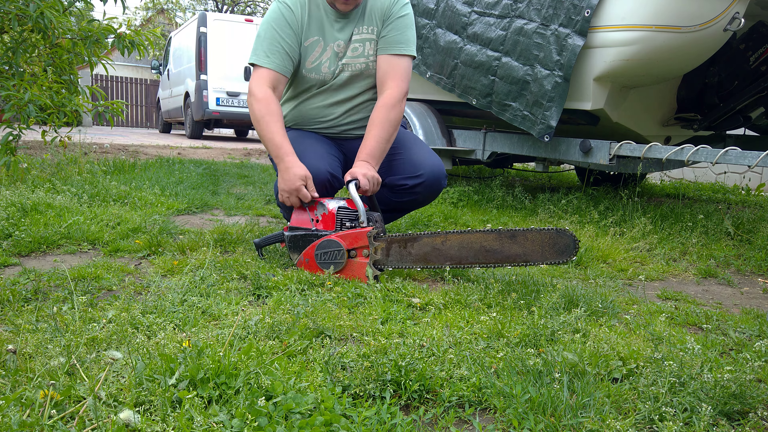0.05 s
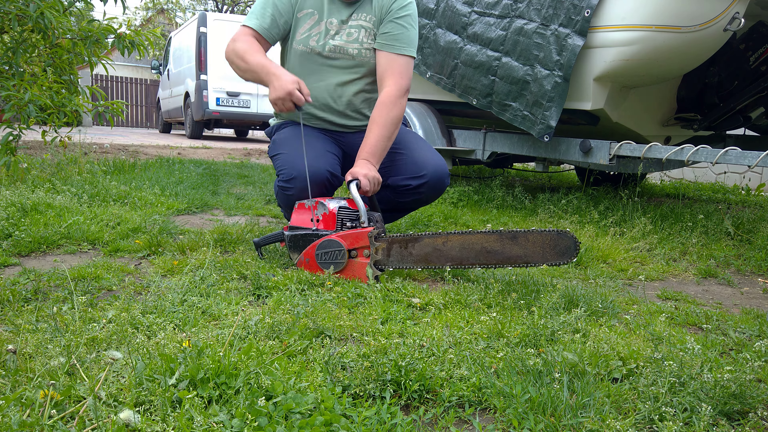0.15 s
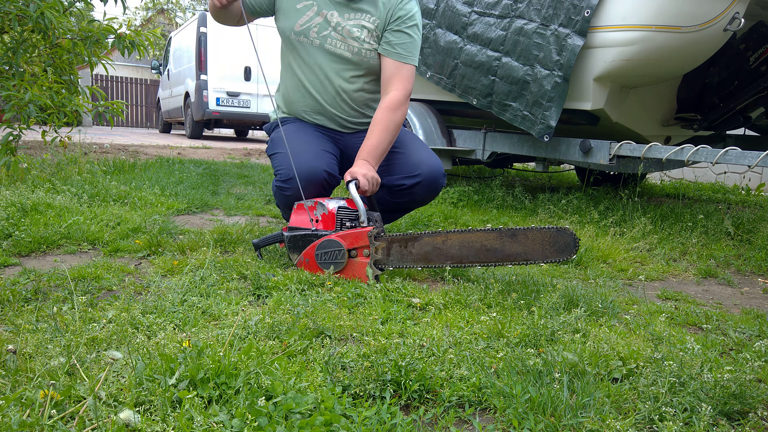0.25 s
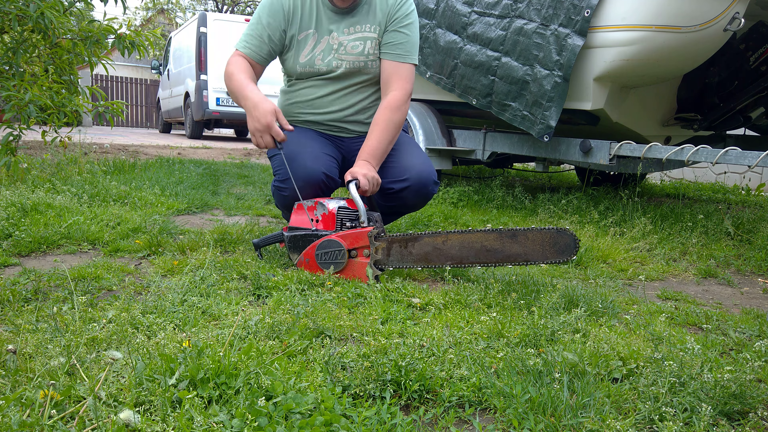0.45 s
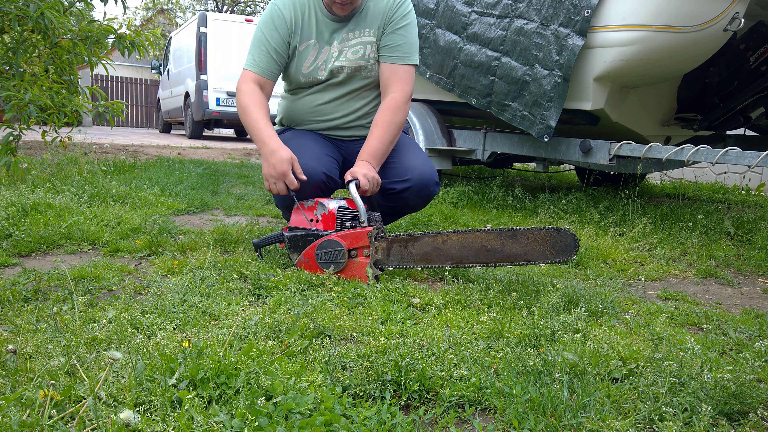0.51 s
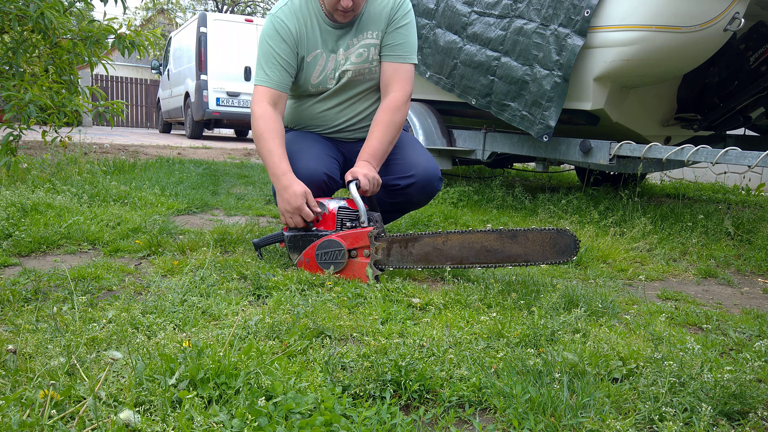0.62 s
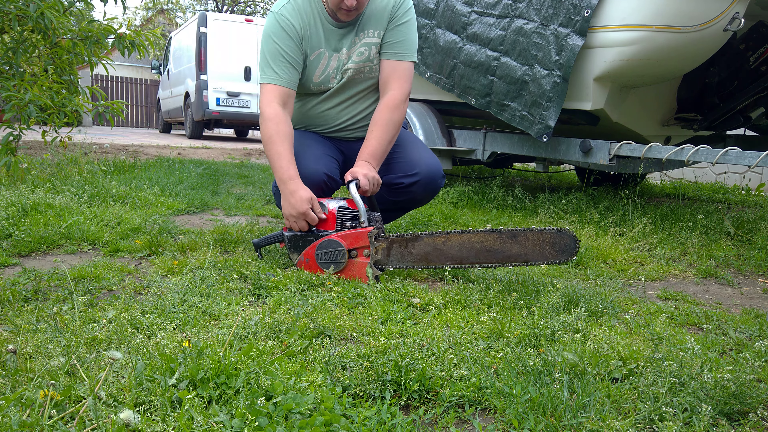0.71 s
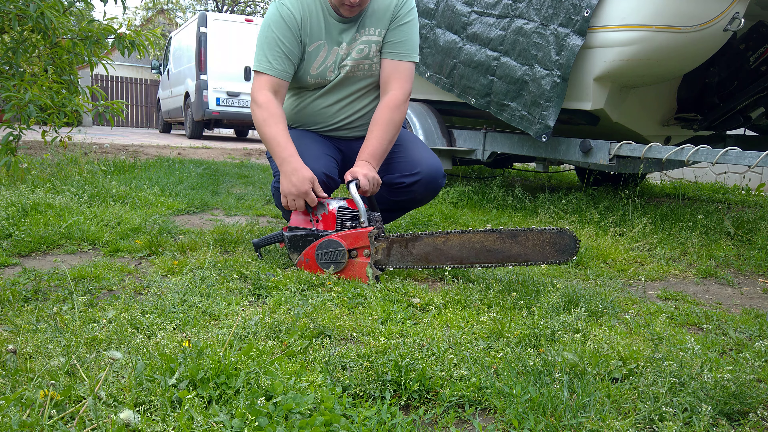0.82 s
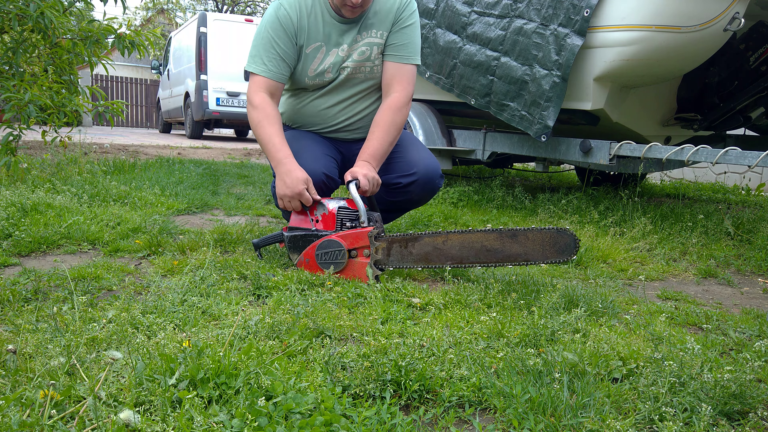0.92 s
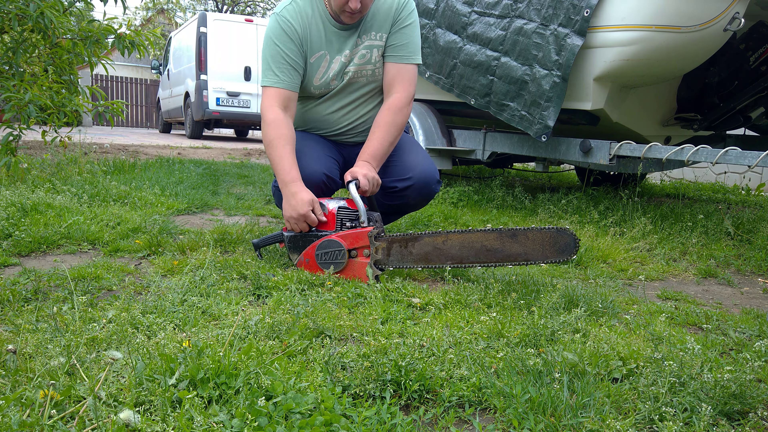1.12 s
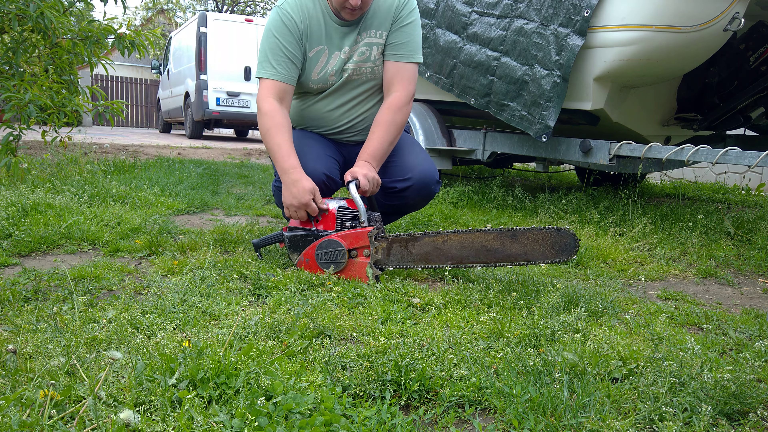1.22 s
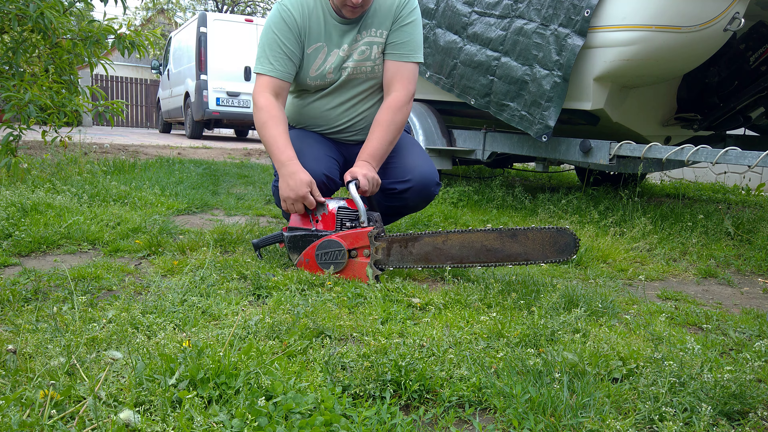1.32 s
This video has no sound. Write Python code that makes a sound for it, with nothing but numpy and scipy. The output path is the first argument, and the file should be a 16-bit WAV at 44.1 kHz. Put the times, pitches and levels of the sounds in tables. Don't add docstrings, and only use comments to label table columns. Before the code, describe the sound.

A chainsaw is pull-started once but does not catch. A faint bird whistles at 0-0.15 s over quiet garden air. From 0.2 s, about nine fast hollow chuffs with whirr and clatter slow and fade by 0.5 s. Cord rattle and plastic knocks continue to 0.9 s, with bird chirps near 0.8 s, then small clicks around 1.1 s. One channel is open, the other muffled with low hum.

```python
import sys
import numpy as np
from scipy import signal
from scipy.fft import rfft, irfft, next_fast_len
from scipy.io import wavfile
from scipy.ndimage import uniform_filter1d

SR = 44100
rng = np.random.default_rng(int(sys.argv[2]) if len(sys.argv) > 2 else 0)


def attenuation_scalar(level_db):
    decades = np.asarray(level_db, float) / 20
    return 10 ** decades


def log_audio(samples):
    frames = np.atleast_2d(samples).T
    limited = np.clip(frames, -1, 1)
    pcm = np.round(limited * 32767).astype(np.int16)
    wavfile.write(sys.argv[1], SR, pcm)


N = 59535
T = np.arange(N) / SR


def walk(rate_hz):
    k = int(SR / rate_hz)
    steps = np.repeat(rng.standard_normal(N // k + 1), k)
    return 1.1 * uniform_filter1d(uniform_filter1d(steps, k), k)[:N]


def colour(x, table):
    hz, db = np.array(table, float).T
    f = np.fft.rfftfreq(N, 1 / SR) + 1
    curve = attenuation_scalar(np.interp(np.log(f), np.log(hz), db))
    y = irfft(rfft(x) * curve, N)
    return y / np.std(y)


def fader(table):
    return attenuation_scalar(np.interp(T, *np.array(table).T, left=-99, right=-99))


def ring(push, hz, t60_s):
    pole = np.exp(2j * np.pi * hz / SR - np.log(1000) / (t60_s * SR))
    return signal.lfilter([1], [1, -pole], push + 0j).imag


def echo(x, t60_s, db):
    t = T[:SR // 2]
    tail = rng.standard_normal(len(t)) * attenuation_scalar(-60 * t / t60_s) * np.clip(t / 0.015, 0, 1)
    return attenuation_scalar(db) * signal.fftconvolve(x, tail / np.sqrt(np.sum(tail ** 2)))[:N]


def burst(start_s, length_s):
    u = T - start_s
    fade = np.exp(-np.clip(u - 0.2 * length_s, 0, None) / (0.65 * length_s))
    return np.clip(u / 0.00066, 0, 1) * fade


def ticks():
    hits_per_s = 2500
    hits = (rng.random(N) < hits_per_s / SR) * attenuation_scalar(2.5 * rng.exponential(size=N))
    x = rng.standard_normal(N) * (0.51 + uniform_filter1d(hits, size=9) * 6)
    return x / np.std(x)


# freq_hz, level_db (per Hz)
OPEN_AIR = [(40, -6), (150, 7.5), (700, -14.5), (1100, -13.5), (2000, -17.5), (4500, -11.5), (8000, -21),
            (15500, -33.5)]


def garden_air():
    return attenuation_scalar(-60 + 0.73 * walk(7.1)) * colour(rng.standard_normal(N), OPEN_AIR)


# freq_hz, level_db (per Hz)
SHUT_AIR = [(60, 1), (130, -11.5), (700, -12.5), (1100, -16.5), (1600, -35), (3000, -30), (7000, -41.5),
            (15500, -56)]


def pocket_air():
    return attenuation_scalar(-51 + 1.2 * walk(11.6)) * colour(rng.standard_normal(N), SHUT_AIR)


def pocket_hum():
    hum_hz, hum_db, wobble_db = 39.8, -41.5, -0.1
    turns = hum_hz * np.cumsum(1 + 0.015 * walk(5.5)) / SR
    return np.sqrt(2) * attenuation_scalar(hum_db + wobble_db * walk(9)) * np.sin(2 * np.pi * turns)


# start_s, level_db, high_hz, low_hz, hold_s
BIRD_NOTES = [(.002, -50.5, 5300, 3316, 0.015), (.04, -70, 5150, 3600, .012),
              (.048, -51.5, 4270, 3200, .004), (.07, -59.5, 4670, 3200, .004),
              (.098, -52.5, 4820, 3230, 0.0038), (.125, -59, 4300, 3200, 0.0046),
              (.804, -46, 5210, 3550, 0.027), (.84, -61, 5300, 3536, 0.036), (.845, -63, 4420, 3200, .004),
              (.872, -51.5, 4250, 3257, .004), (.94, -60, 5060, 3710, 0.017)]


def bird():
    fall_s, pitch_jitter, flutter_db = 0.037, 0.025, 4
    whistle = 0
    for start_s, level_db, high_hz, low_hz, hold_s in BIRD_NOTES:
        u = T - start_s
        left_to_fall = np.clip(1 - np.clip(u - hold_s, 0, None) / fall_s, 0, 1) ** 1.41
        hz = low_hz + (high_hz - low_hz) * left_to_fall
        shape = np.clip(u / 0.0023, 0, 1) * np.clip((hold_s + fall_s - u) / 0.0039, 0, 1)
        phase = 2 * np.pi * np.cumsum(hz * (1 + pitch_jitter * walk(250))) / SR
        whistle = whistle + attenuation_scalar(level_db + flutter_db * walk(200)) * shape * np.sin(phase)
    direct, trees = attenuation_scalar(-4) * whistle, echo(whistle, t60_s=0.24, db=3.5)
    return direct + trees


# pitch_hz, level_db, t60_s
SHELL_MODES = [(507.6, 2, 0.05), (525, -0.5, 0.034), (682, 1, 0.024), (800, -3.5, 0.022),
               (880, -10.5, 0.05), (1030, 2.5, 0.013), (1361, 1.5, 0.015), (1640, -18.5, 0.023),
               (2335, -12.5, .012), (2528, -3.5, 0.038), (2750, -14.5, 0.029), (3200, -38, 0.0045)]


def housing(push, spot_hz):
    scatter_db, spot_db_per_octave = 2, 11
    luck_db = scatter_db * rng.standard_normal(len(SHELL_MODES))
    y = 0
    for luck, (hz, db, t60_s) in zip(luck_db, SHELL_MODES):
        distance_db = spot_db_per_octave * abs(np.log2(hz / spot_hz))
        y = y + attenuation_scalar(db + luck - distance_db) * ring(push, hz, t60_s)
    return 0.037 * signal.sosfilt(signal.butter(3, [380, 5000], "band", fs=SR, output="sos"), y)


# start_s, body_db, bright_db, length_s, spot_hz (where the shell is struck)
KNOCK_HITS = [(.115, -44, -55, 0.012, 1030), (.165, -56, -38.5, 0.0016, 930), (0.191, -32, -65, 0.027, 880),
              (.210, -24, -28.5, 0.0031, 800), (0.265, -24, -28, 0.016, 1310),
              (0.31, -26.5, -32.5, 0.024, 880), (.350, -61, -23.5, 0.0028, 900),
              (0.389, -28.5, -28, 0.0059, 880), (.434, -30.5, -36, 0.025, 1680),
              (.462, -33.5, -48, 0.0098, 1350), (.489, -35, -32, 0.02, 890),
              (0.515, -34, -45.5, 0.058, 1300), (0.568, -30.5, -36, 0.0025, 1030),
              (.598, -40, -36, 0.012, 910), (.651, -40, -40, 0.039, 1100),
              (0.681, -31, -41.5, 0.0037, 1220), (0.735, -27.5, -40, 0.014, 518),
              (0.784, -42.5, -49.5, 0.023, 1400), (0.863, -48.5, -50.5, 0.02, 800),
              (0.8891, -29, -29.5, 0.019, 590), (1.071, -55, -38.5, 0.0088, 1030),
              (1.087, -43, -42.5, 0.013, 660), (1.131, -50.5, -53.5, 0.012, 800),
              (1.144, -26.5, -40, 0.0058, 800), (1.293, -73.5, -51.5, 0.0093, 800)]


def knocks():
    crack_s, crack_db, bite_hz, bite_db = 0.00056, -4, 2870, 0.5
    bright = colour(ticks(), [(900, 0), (2000, -2.5), (2800, -4), (3600, -1.5), (6500, -6.5), (15500, -26)])

    def struck(shape, hz, length_s):
        y = housing(shape * ticks(), hz)
        return y / np.sqrt(np.sum(y ** 2) / (length_s * SR))

    out = 0
    for start_s, body_db, bright_db, length_s, spot_hz in KNOCK_HITS:
        shape = burst(start_s, length_s) + attenuation_scalar(crack_db) * burst(start_s, crack_s)
        body = struck(shape, spot_hz, length_s)
        bite = struck(shape, bite_hz, length_s)
        out = out + attenuation_scalar(body_db) * body + attenuation_scalar(bright_db) * (shape * bright + attenuation_scalar(bite_db) * bite)
    return out


# time_s, level_db
SHUDDER_RIDE = [(.14, -62), (.2, -32), (.45, -22.5), (.56, -34.5), (.66, -39), (.78, -49), (.87, -54),
                (.97, -44), (1.05, -69)]


def shudder():
    rumble = colour(rng.standard_normal(N), [(45, -30), (70, -9), (87, 0), (135, -3), (250, -16),
                                             (900, -45), (8000, -110)])
    return attenuation_scalar(-4) * fader(SHUDDER_RIDE) * rumble


# puff_s (exhaust), exhaust_db, intake_db, clatter_db (housing)
CRANK_TURNS = [
    (0.218, -9, -14, -18),
    (.248, -7.5, -13, -16.5),
    (.276, -8, -9, -18.5),
    (.301, -11.5, -12.5, -16),
    (.327, -7.5, -17, -9.5),
    (.357, -9.5, -15.5, -48),
    (.393, -10, -12.5, -31.5),
    (.446, -16, -18.5, -20),
    (.505, -26, -23.5, -32),
]


def intake_openings():
    puffs = np.array(CRANK_TURNS)[:, 0]
    turn_s = np.diff(puffs, prepend=puffs[0] - 0.0399)
    return puffs - 0.00438 - 0.22 * turn_s


def exhaust_slugs():
    pitch_hz, length_s, sag, skew_rad = 165.7, 0.013, 0.45, 0.29
    gas = 0
    for puff_s, exhaust_db, _, _ in CRANK_TURNS:
        u = np.clip((T - puff_s) / length_s, -0.5, 0.5)
        phase = 2 * np.pi * pitch_hz * length_s * u * (1 - sag * u) + skew_rad
        gas = gas + attenuation_scalar(exhaust_db) * np.cos(np.pi * u) * np.cos(phase)
    return gas


def intake_pops():
    pitch_hz, decay_s, sag = 417, 0.0035, 0.22
    gas = 0
    for opens_s, (_, _, intake_db, _) in zip(intake_openings(), CRANK_TURNS):
        v = np.clip(T - opens_s + 0.002056, 0, None)
        phase = 2 * np.pi * pitch_hz * v * (1 - sag * np.minimum(v / 0.02, 1))
        gas = gas - 1.56 * attenuation_scalar(intake_db) * np.exp(-v / decay_s) * np.sin(phase)
    return gas


def clatter():
    shake = 0
    for opens_s, (_, _, _, clatter_db) in zip(intake_openings(), CRANK_TURNS):
        shake = shake + attenuation_scalar(clatter_db) * burst(opens_s - 0.003, 0.0099)
    return housing(shake * ticks(), 810)


# pitch_hz, level_db, t60_s
MUFFLER_MODES = [(81, -6, 0.45), (144, -6, 0.26), (205, -20, 0.042), (233.3, 7, 0.24)]


def muffler(gas):
    body = sum(attenuation_scalar(db) * ring(gas, hz, t60_s) for hz, db, t60_s in MUFFLER_MODES)
    return attenuation_scalar(-10) * 0.0021 * body


# time_s, level_db
SPIN_RIDE = [(.15, -56.5), (.195, -37.5), (.215, -29), (.36, -32.5), (.41, -35), (.5, -44.5), (.57, -49.5),
             (.67, -36.5), (.70, -74)]
# freq_hz, level_db (per Hz)
WHIRR_TONE = [(500, -10), (850, 1.5), (1400, -5), (2600, -8), (5000, -11), (9000, -20), (15500, -29.5)]


def fan_and_hiss():
    whirr = colour(ticks(), [(150, 0)] + list(WHIRR_TONE))
    spin = fader(SPIN_RIDE) * attenuation_scalar(4.3 * walk(69.47))
    puff = 0
    for puff_s, exhaust_db, _, _ in CRANK_TURNS:
        puff = puff + attenuation_scalar(exhaust_db + 7) * burst(puff_s - 0.003, 0.006)
    return (spin + attenuation_scalar(-33) * puff) * whirr


def engine():
    gas = exhaust_slugs() + intake_pops()
    saw = gas + muffler(gas) + clatter() + fan_and_hiss() + shudder()
    return signal.sosfilt(signal.butter(2, 51, "high", fs=SR, output="sos"), saw)


def pocket(x):
    cavity_hz, cavity_db, cavity_q = 972, -6.5, 2.6
    neck_hz, neck_db, neck_q = 2740, -2.5, 4
    skin_hz, lag_s = 324, 0.00046
    size = next_fast_len(N + 4096)
    s = 1j * np.fft.rfftfreq(size, 1 / SR)
    a, b = s / cavity_hz, s / neck_hz
    cavity = attenuation_scalar(cavity_db) / (1 + a / cavity_q + a * a) / (1 + s / 5000)
    neck = attenuation_scalar(neck_db) * b / neck_q / (1 + b / neck_q + b * b)
    skin = (skin_hz - s) / (skin_hz + s)
    detour = np.exp(-2 * np.pi * s * lag_s)
    return irfft(rfft(x, size) * (cavity + neck) * skin * detour, size)[:N]


def scene():
    saw = engine() + knocks()
    dull = signal.lfilter(*signal.butter(2, 3000, fs=SR), saw)
    direct = saw + bird()
    near, far = (direct + echo(dull, t60_s=0.17, db=-13) for _ in range(2))
    return np.array([near + garden_air(), pocket(far) + pocket_air() + pocket_hum()])


def top_cut(x):
    return signal.sosfilt(signal.butter(12, 15890, fs=SR, output="sos"), x)


def record(dry):
    mix = signal.sosfilt(signal.ellip(8, 0.2, 70, 15700, fs=SR, output="sos"), dry)
    return top_cut(mix)


dry = scene()
out = record(dry)
log_audio(out)
```